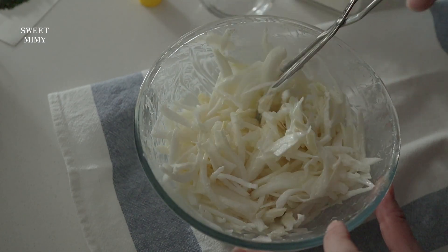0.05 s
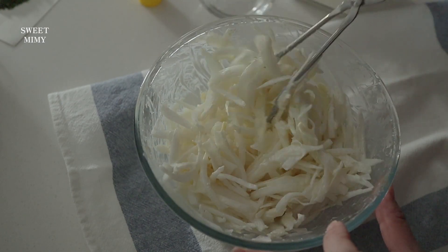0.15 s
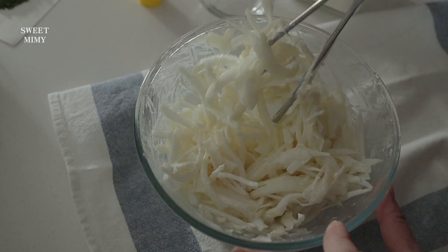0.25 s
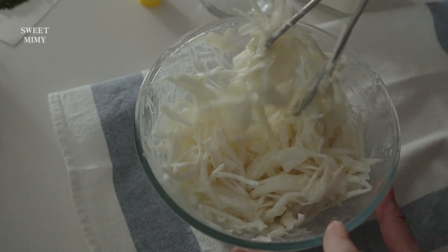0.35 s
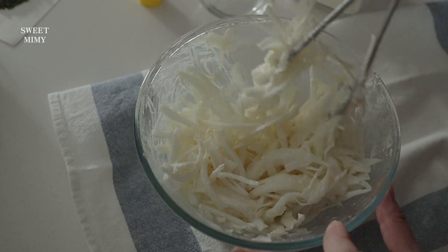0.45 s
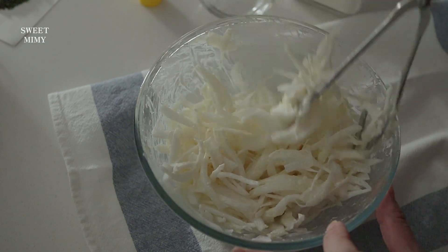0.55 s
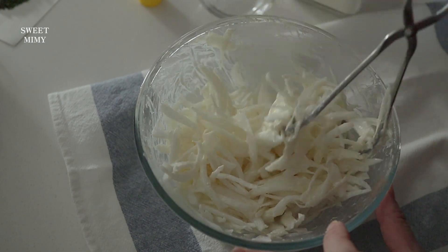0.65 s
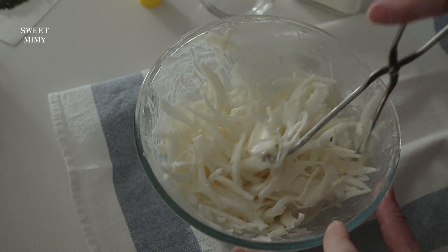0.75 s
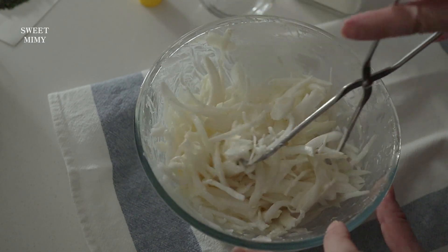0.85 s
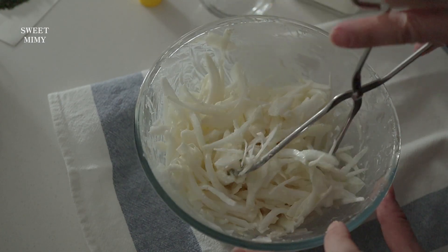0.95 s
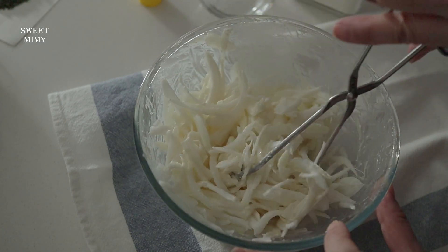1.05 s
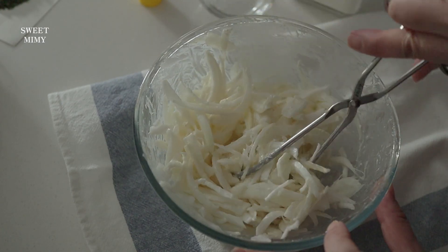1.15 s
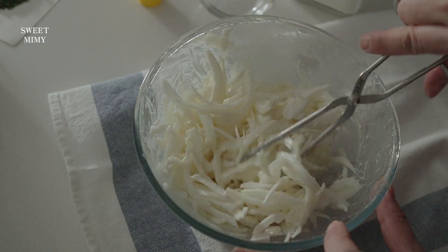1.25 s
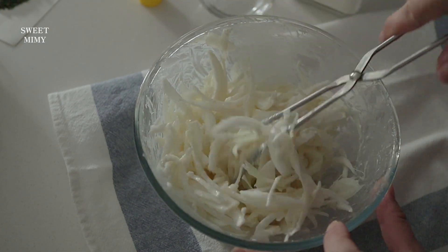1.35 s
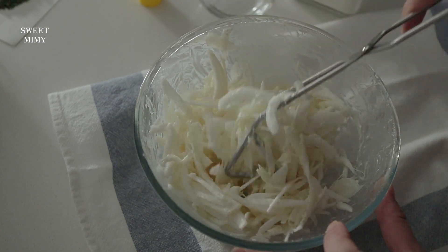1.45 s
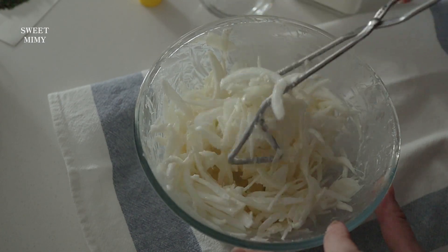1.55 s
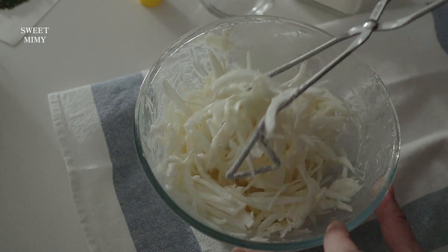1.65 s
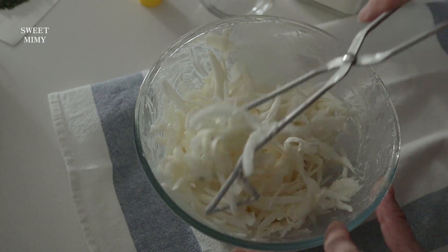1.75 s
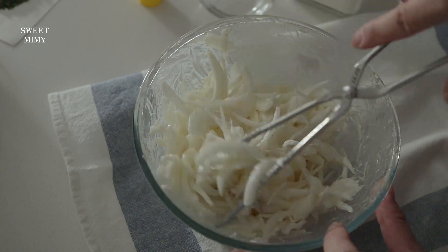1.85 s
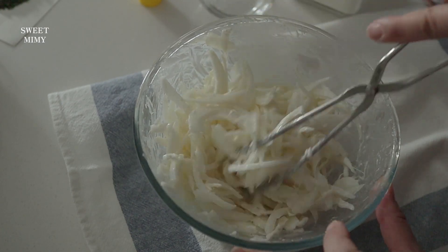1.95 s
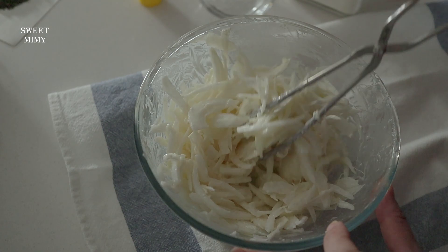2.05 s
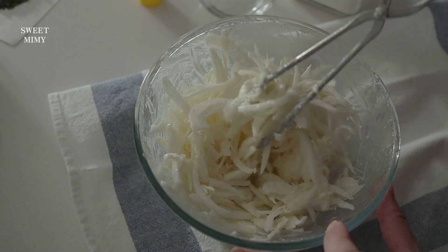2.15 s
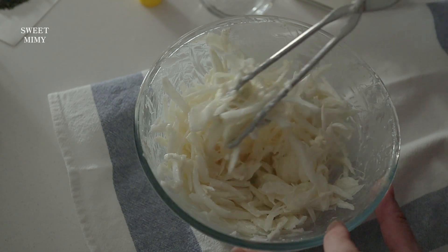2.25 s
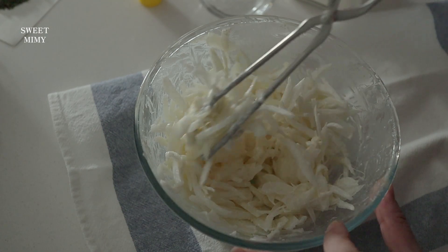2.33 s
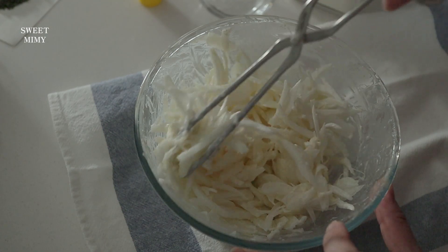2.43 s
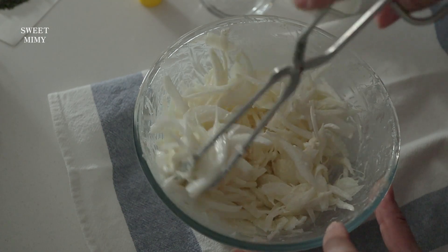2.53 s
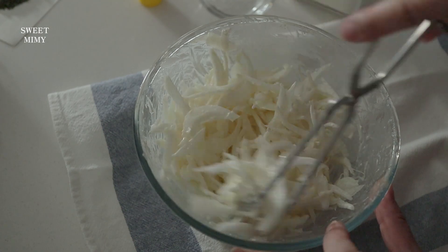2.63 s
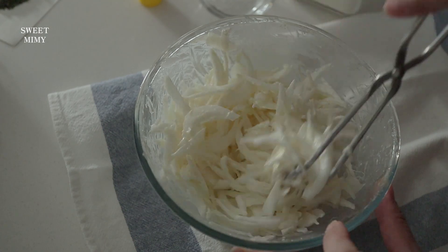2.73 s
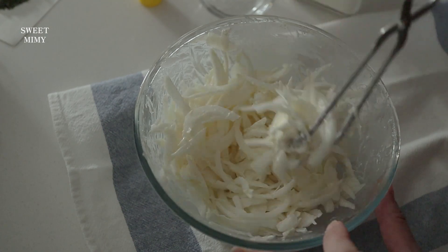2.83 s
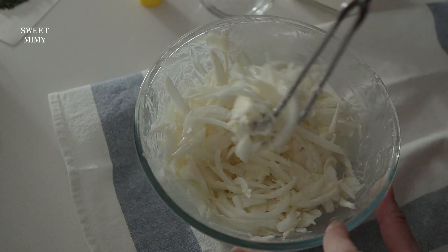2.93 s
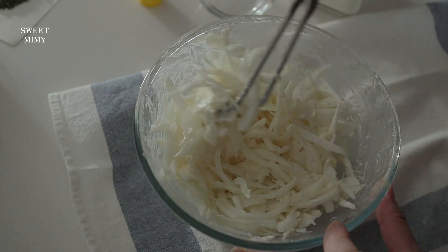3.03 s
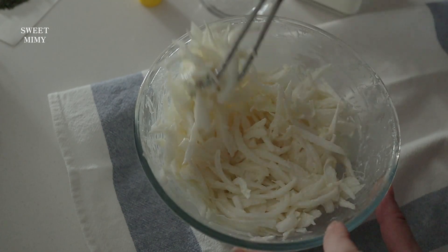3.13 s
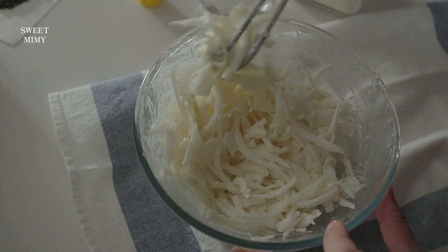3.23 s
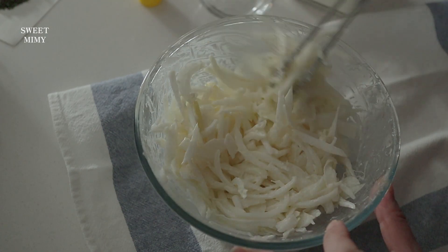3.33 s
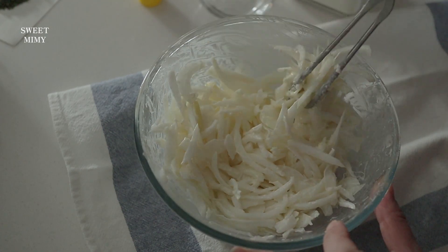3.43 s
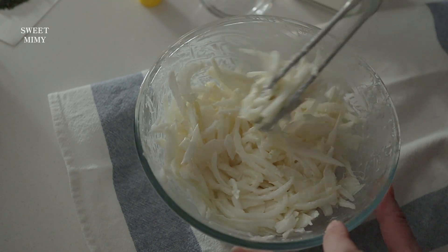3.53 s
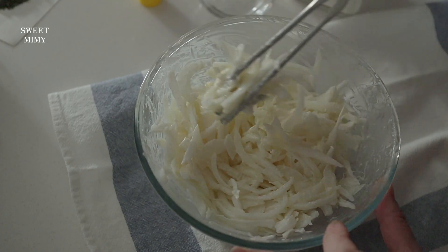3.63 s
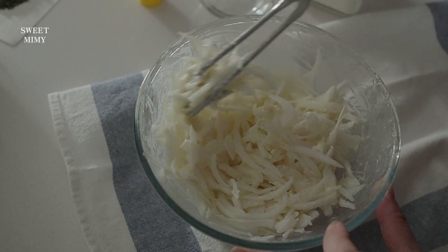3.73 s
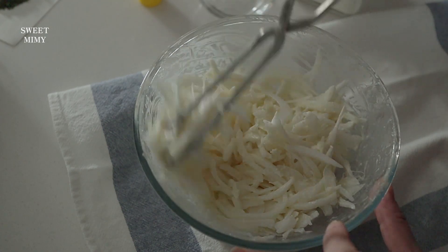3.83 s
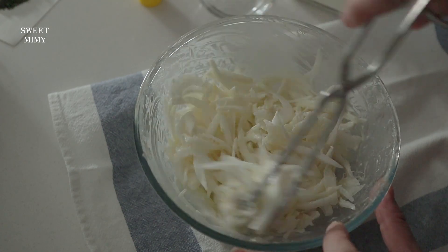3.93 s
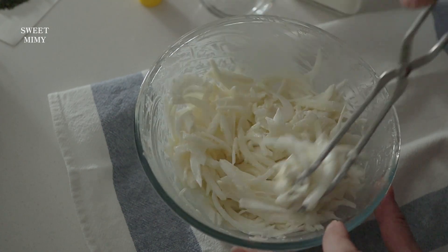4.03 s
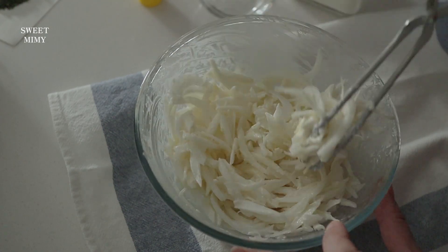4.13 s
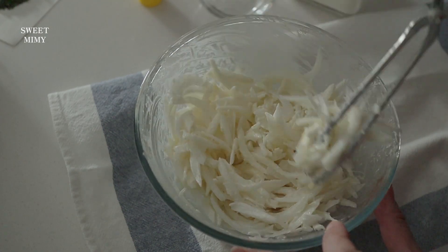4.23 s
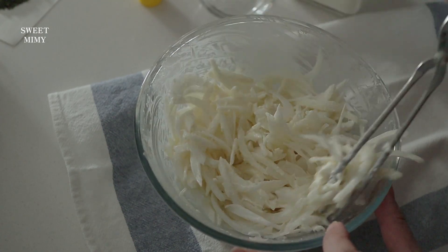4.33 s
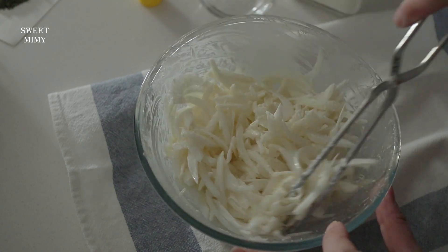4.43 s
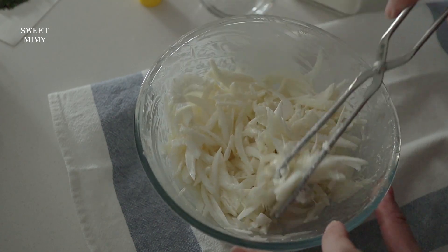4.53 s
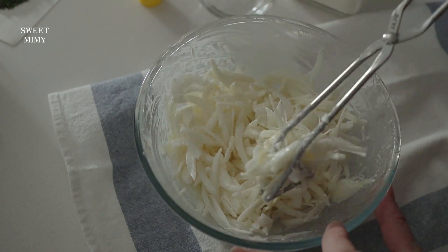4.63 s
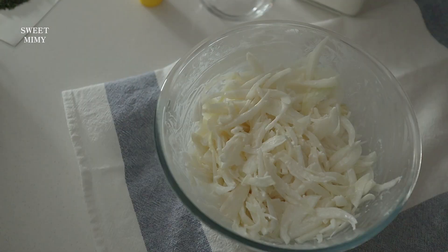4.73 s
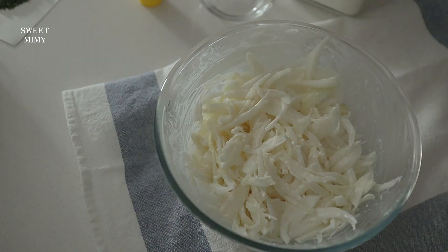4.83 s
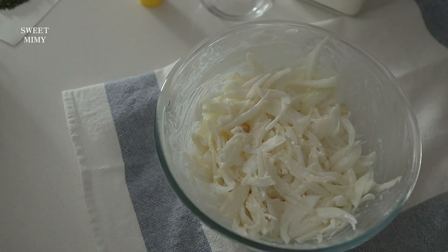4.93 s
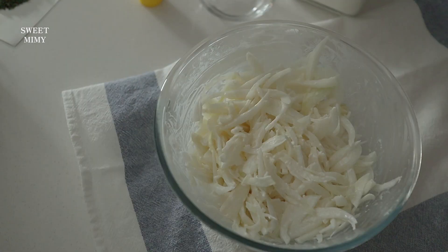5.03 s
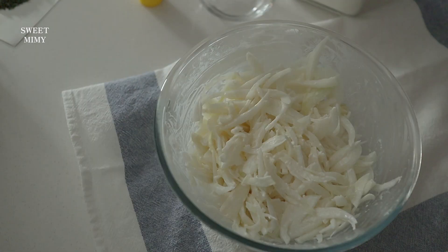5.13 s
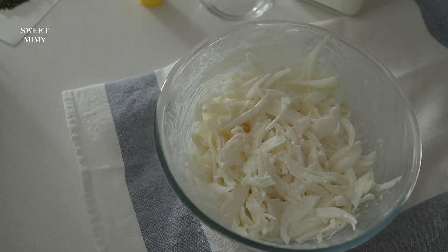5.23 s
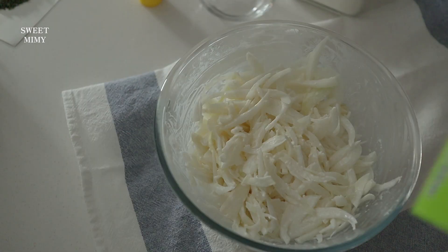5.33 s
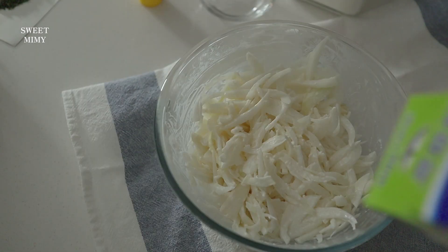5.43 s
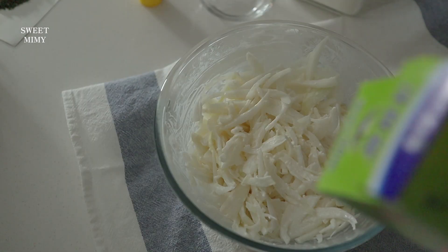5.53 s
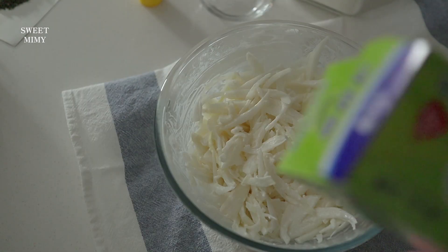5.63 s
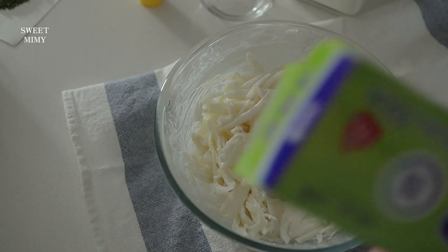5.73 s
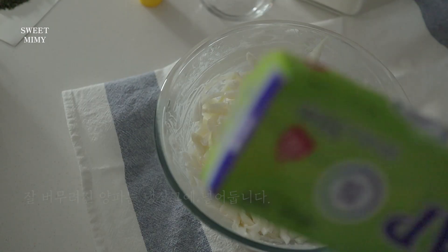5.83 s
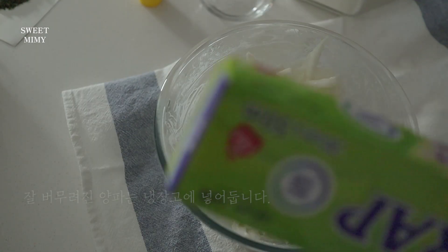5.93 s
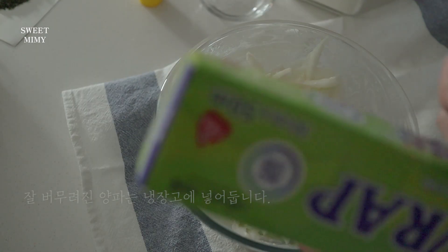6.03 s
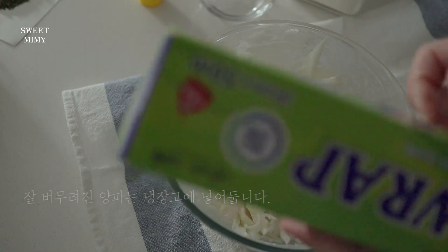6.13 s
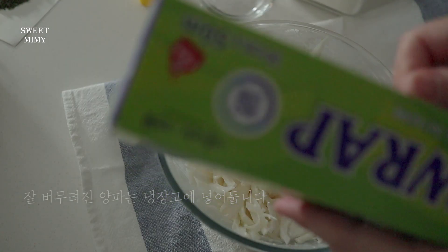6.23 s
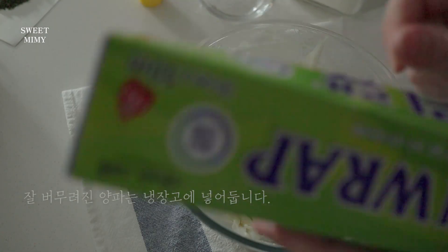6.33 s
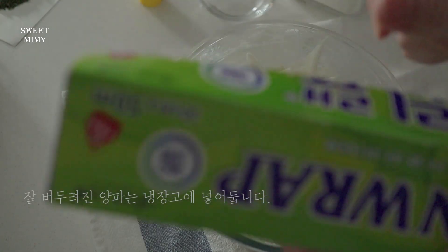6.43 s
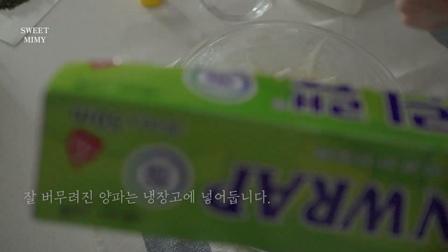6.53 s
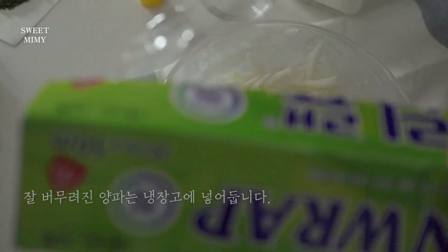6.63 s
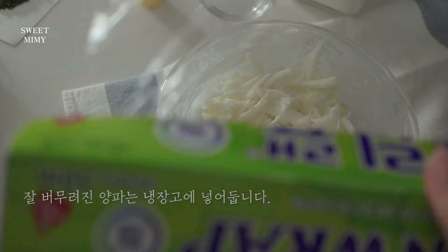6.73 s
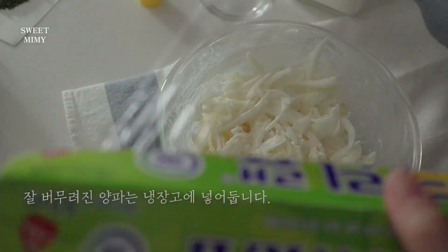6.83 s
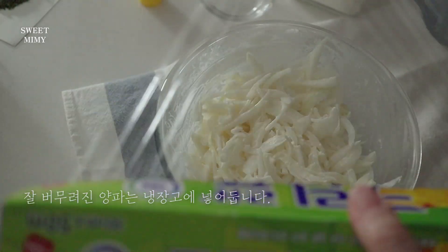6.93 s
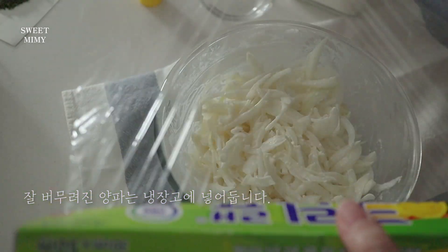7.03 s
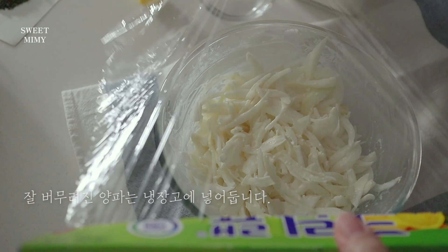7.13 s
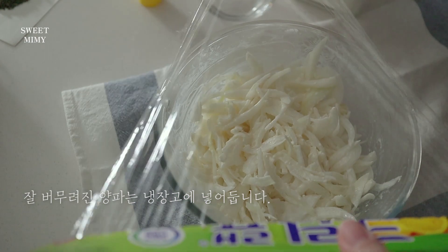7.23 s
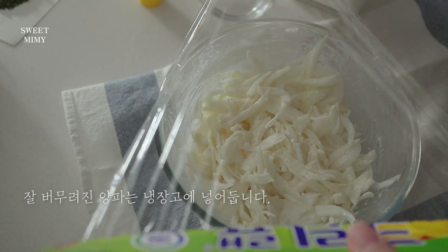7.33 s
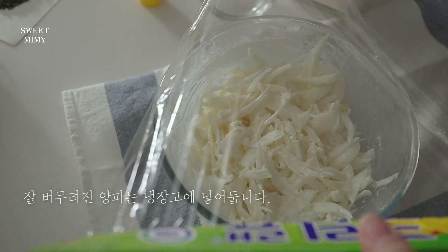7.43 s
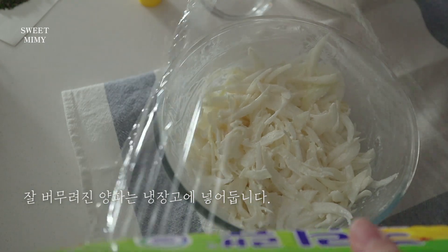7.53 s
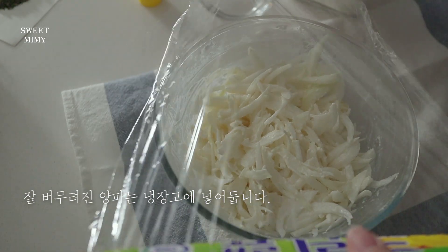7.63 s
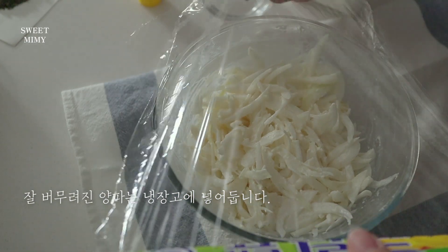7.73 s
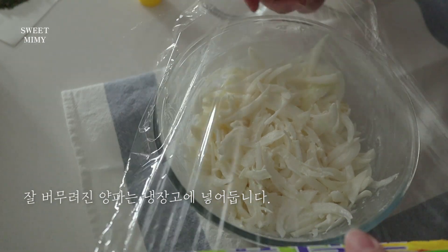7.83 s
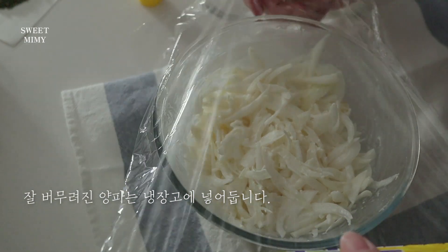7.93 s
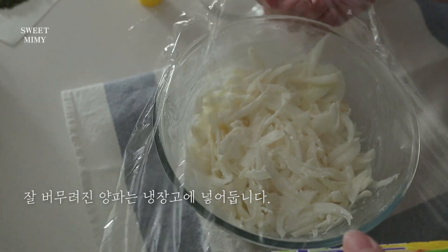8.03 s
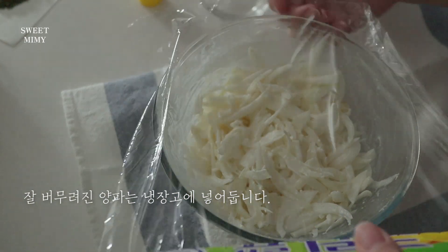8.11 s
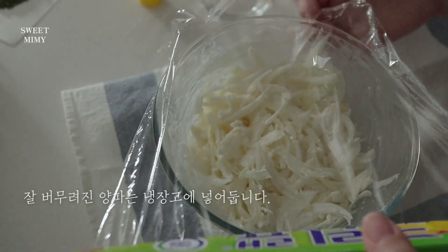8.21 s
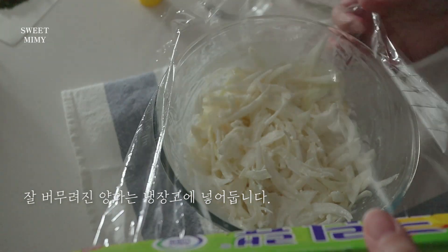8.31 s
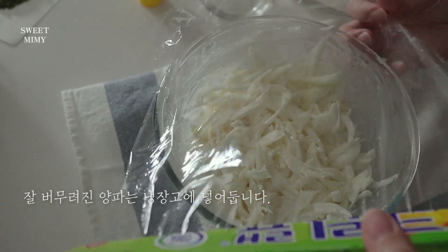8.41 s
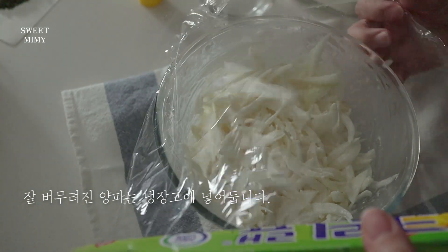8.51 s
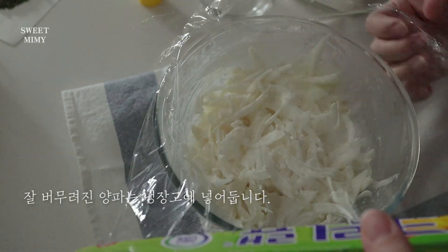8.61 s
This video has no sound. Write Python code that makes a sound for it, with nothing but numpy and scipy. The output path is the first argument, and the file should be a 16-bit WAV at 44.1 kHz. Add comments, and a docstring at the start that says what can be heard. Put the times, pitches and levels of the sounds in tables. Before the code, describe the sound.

Close kitchen sounds: sparse bright tong clinks on glass, a brief squeal, then box handling, sharp snaps and crisp plastic wrap crinkling over the bowl.

```python
"""A faint kitchen hum and a soft shuffle of a glass bowl on its towel, then metal tongs toss sliced onion in it.
Everything is close to one microphone, with a little of the room behind; the tongs clink and scrape on the glass.
Then a cardboard box of cling film is handled and film is peeled off the roll, crinkling over the bowl.
Blows and bumps set decaying sines ringing; onion, film and scraping are random clicks, filtered and swelling;
the hum is coloured noise and the room a set of feedback delays."""
import sys
import numpy as np
from scipy import signal
from scipy.fft import rfft, irfft
from scipy.io import wavfile

SR = 44100
rng = np.random.default_rng(int(sys.argv[2]) if len(sys.argv) > 2 else 0)


def to_wav(s):
    """Save 16-bit WAV."""
    ch = np.atleast_2d(s).T  # columns
    pcm = np.round(np.clip(ch, -1, 1) * 32767)  # PCM
    wavfile.write(sys.argv[1], SR, pcm.astype(np.int16))


def ratio_of_db(decibels):
    """Turn decibels (scalar or array-like) into linear amplitude factors; 0 dB maps to 1."""
    return 10 ** (np.asarray(decibels, float) / 20)


N = 382347


def rms_one(x):
    """Scaled to rms 1."""
    return x / np.sqrt(np.mean(x ** 2) + 1e-20)


def in_time(rows, outside=-120):
    """Columns as curves per sample; held at the outside value beyond the table."""
    s, *columns = np.transpose(rows)
    return [np.interp(np.arange(N) / SR, s, c, outside, outside) for c in columns]


def strokes(rows, rise_db_per_s, fall_db_per_s):
    """Each row swells to its level, holds and fades; powers add, other columns are averaged over the rows
    weighted by their power."""
    s, held, db, *columns = np.transpose(rows)[:, :, None]
    t = np.arange(0, N + 32, 32) / SR
    rise_db = rise_db_per_s * np.maximum(s - t, 0)
    fall_db = fall_db_per_s * np.maximum(t - s - held, 0)
    power = ratio_of_db(2 * np.maximum(db - rise_db - fall_db, -150))
    total = power.sum(0)
    curves = [10 * np.log10(total)] + [(c * power).sum(0) / total for c in columns]
    return [np.interp(np.arange(N) / SR, t, c) for c in curves]


def coloured(x, spectrum):
    """Minimum-phase filter of a spectrum in (Hz, dB), so clicks stay sharp and causal."""
    hz, db = np.transpose(spectrum)
    grid = np.arange(2049) * SR / 4096 + 1
    cepstrum = irfft(np.log(ratio_of_db(np.interp(np.log(grid), np.log(hz), db))))
    # folding the cepstrum makes the phase minimal
    cepstrum[1:2048] *= 2
    cepstrum[2049:] = 0
    return signal.fftconvolve(x, irfft(np.exp(rfft(cepstrum))))[:N]


def band(x, low_hz, high_hz):
    """Band-pass with gentle slopes."""
    return signal.sosfilt(signal.butter(2, [low_hz, min(high_hz, 20000)], "band", fs=SR, output="sos"), x)


def tilted(x, bright, cross_hz=5500):
    """Treble above the crossover is multiplied by the gain bright."""
    high = signal.sosfilt(signal.butter(2, cross_hz, "high", fs=SR, output="sos"), x)
    low = signal.sosfilt(signal.butter(2, cross_hz, fs=SR, output="sos"), x)
    return low - bright * high   # the minus avoids a notch at the crossover


def ring(clicks, hz, t60):
    """A damped mode: a unit click sets a sine of height 1 ringing, 60 dB down after t60 seconds."""
    r, w = ratio_of_db(-60 / (t60 * SR)), 2 * np.pi * hz / SR
    return signal.lfilter([0, np.sin(w)], [1, -2 * r * np.cos(w), r * r], clicks + 1e-18)


def hollow(x, peaks):
    """Broad resonances in parallel, with alternating signs."""
    return sum((-1) ** k * ratio_of_db(db) * np.sqrt(width) * ring(x, hz, 1.25 / width)
               for k, (hz, width, db) in enumerate(peaks))


def drift(rate):
    """Slow random curve of rms 1; rate in Hz."""
    r = np.exp(-2 * np.pi * rate / SR)
    return rms_one(signal.lfilter([1], [1, -2 * r, r * r], rng.standard_normal(N + SR))[SR:])


def grains(per_s, spread_db):
    """Random clicks of uneven size and sign; the fewer, the larger; rms 1."""
    sizes = ratio_of_db(spread_db * np.minimum(rng.exponential(1, N), 5)) * rng.choice([-1, 1], N)
    struck = rng.random(N) < per_s / SR
    return rms_one(sizes * struck / np.sqrt(np.minimum(per_s, SR)))


def burst(s, length_s):
    """Sample index and a short noise dying away exponentially."""
    t = np.arange(1024) / SR
    return round(s * SR), rng.standard_normal(1024) * np.exp(-t / length_s)


def add(out, at, piece):
    """Mixes a piece into out from sample at on."""
    out[at:at + len(piece)] += piece[:N - at]


# spectrum shape of the hum in the quiet kitchen: (frequency [Hz], level [dB])
HUM_SPECTRUM = [(15, -34.5), (25, -7), (64, 1), (92, -6.5), (180, -4), (223, -11), (277, -9.5), (427, -14),
                (641, -14.5), (695, -17.5), (818, -16.5), (1290, -23), (2050, -25.5), (16000, -33)]


def kitchen_hum():
    """The steady floor of the place: noise coloured by the hum's spectrum."""
    hum_rms_db = -48.5
    return ratio_of_db(hum_rms_db) * rms_one(coloured(rng.standard_normal(N), HUM_SPECTRUM))


def kitchen_room(x):
    """Room behind the close sound: eight feedback delays, duller on every round, stepped block by block."""
    t60_s, wall_cut_hz = 0.22, 12000
    out, dull = np.zeros(N), np.exp(-2 * np.pi * wall_cut_hz / SR)
    lags = (rng.uniform(.008, .03, 8) * SR).astype(int)
    for k, lag in enumerate(lags):
        loop, gain, state = x.copy(), ratio_of_db(-60 * lag / SR / t60_s), [0.]
        for i in range(lag, N, lag):
            back, state = signal.lfilter([gain * (1 - dull)], [1, -dull], loop[i - lag:i], zi=state)
            loop[i:i + lag] += back[:N - i]
        out += (loop - x) * (-1) ** k
    return out


# bumps of worktop and hollow box: (time [s], level [dB], pitch [Hz])
THUD_TIMES = [(.853, -26.5, 166), (3.29, -33.5, 46), (4.02, -40.5, 42.7), (4.411, -21, 110),
              (4.42, -28, 51.4), (4.849, -31.5, 374), (5.442, -11.5, 247), (5.444, -14, 87),
              (5.575, -17, 189), (5.62, -15.5, 257), (5.68, -20.5, 45.3), (6.18, -21, 102),
              (6.457, -3.5, 750), (6.67, -22.5, 145), (7.157, -16, 270), (7.158, -30.5, 49),
              (7.325, -16, 750), (7.75, -38, 83.5)]


def thuds():
    """Each bump sets one mode of worktop or hollow box ringing, softly struck."""
    ring_cycles, swell_cycles = 22, 0.47   # until 60 dB down; time constant of the onset
    out, push = np.zeros(N), np.arange(SR) == 0
    for s, db, hz in THUD_TIMES:
        swell = 1 - np.exp(-np.arange(SR) / SR * hz / swell_cycles)
        mode = band(ring(push, hz, ring_cycles / hz), hz / 3, hz * 3)
        add(out, round(s * SR), ratio_of_db(db) * swell * mode)
    return out


# bowl knocking on the towel, broad resonances: (frequency [Hz], width [Hz], level [dB])
ROCKING_PEAKS = [(194.5, 77, 4.7), (254, 65, 2.5), (590, 75.4, -3.5), (734, 120, 0)]
# bowl shuffling on the towel: (start [s], held [s], level [dB])
SHUFFLE_STROKES = [(0, .02, -48), (.853, 0.018, -36.5), (.91, 0.067, -36.5), (1.03, 0.025, -44),
                   (2.73, 0.017, -47.5)]


def bowl_on_towel():
    """The bowl rocks on the towel: clicks through broad low resonances."""
    level_db = strokes(SHUFFLE_STROKES, rise_db_per_s=800, fall_db_per_s=200)[0]
    return ratio_of_db(level_db) * rms_one(hollow(grains(600, 3.0), ROCKING_PEAKS))


# spectrum shape of the wet onion: (frequency [Hz], level [dB per Hz])
ONION_SPECTRUM = [(590, -44.5), (1000, -13), (1350, 2.5), (1850, -5.5), (2650, -1), (4470, -7.5),
                  (9170, -7), (16000, -25)]
# wet onion stirred, the first row at rest: (start [s], held [s], level [dB], brightness [dB])
STIR_STROKES = [(0, 4.7, -75.5, -27.5), (0, 0.023, -50, -2.5), (.97, .4, -52, -3.5),
                (2.08, 0.025, -65.5, 8.5), (2.72, 0.035, -57, -2.5), (3.08, .12, -70.5, 12),
                (3.9, .2, -63, 9.5)]
# short ticks of wet slices; the last is a tick as the box is picked up: (time [s], level [dB], centre [Hz])
SHORT_TICKS = [(0.863, -30, 7900), (0.8712, -22.5, 7970), (1.1967, -29, 4400), (3.8651, -41, 10300),
               (4.0544, -35, 2700), (4.146, -36, 8850), (4.6483, -31.5, 3740), (4.8322, -22.5, 3500)]


def onion():
    """Wet slices tick and hiss: unsteady clicks, and short noises in narrow bands, the last from the box."""
    wet = rms_one(coloured(grains(2700, 2.3) * ratio_of_db(1.6 * drift(28)), ONION_SPECTRUM))
    wet_db, bright_db = strokes(STIR_STROKES, rise_db_per_s=65, fall_db_per_s=73)
    out = ratio_of_db(wet_db) * tilted(wet, ratio_of_db(bright_db))
    for s, db, hz in SHORT_TICKS:
        at, tick = burst(s, 0.0021)
        add(out, at, ratio_of_db(db) * band(tick, hz / 1.3, hz * 1.14))
    return out


# spectrum shape of the film: (frequency [Hz], level [dB per Hz])
FILM_SPECTRUM = [(290, -39.5), (500, -21.5), (740, 0.5), (1080, -13.5), (1280, 1), (1460, -3), (2430, -4),
                 (3020, -9), (3700, -10), (6420, -17), (9090, -15.5), (14900, -28.5), (16000, -44.5)]
# hollow box and roll, broad resonances: (frequency [Hz], width [Hz], level [dB])
BOX_PEAKS = [(60.3, 27, -6.5), (110, 44, -4.5), (210, 64, -1.3), (375, 84, 2.5), (499, 139, 2),
             (734, 115, 0), (1001, 66, -3.5), (1545, 280, -7)]
# the open bowl under the film, broad resonances: (frequency [Hz], width [Hz], level [dB])
BOWL_PEAKS = [(750, 130, -40), (2500, 250, -55), (5900, 150, -63)]
# slow handling, rising and falling: fumbling, box lifted, film drawn off the roll, then slack:
# (time [s], film level [dB], box against film [dB])
HANDLING_CURVE = [(4.74, -75, 7), (4.77, -54.5, 3.5), (5.1, -59.5, 2.5), (5.38, -47.5, 8),
                  (5.53, -52.5, 17.5), (5.73, -36.5, 1.5), (6.06, -45.5, -1.5), (6.29, -51, 7),
                  (6.42, -34.5, -6.5), (6.56, -32.5, -7), (6.8, -22, -5.5), (7.12, -33.5, -2.5),
                  (7.5, -41, 2.5), (7.56, -47.5, 3), (8.0, -52.5, 4.5), (8.67, -50, 4)]
# separate rustles of box and film on top: (start [s], held [s], film level [dB], box against film [dB])
RUSTLE_STROKES = [(4.86, 0.051, -51, 7), (5.02, 0.036, -46.5, 1), (5.443, 0.042, -48, 19),
                  (5.545, 0.11, -28, 6.5), (6.19, 0.033, -40, -1), (6.307, 0.058, -40, 4),
                  (6.445, 0.011, -24, 2.5), (7.285, 0.038, -32.5, -1), (8.013, 0.068, -38, 5.5),
                  (8.152, 0.025, -37, 7), (8.232, .03, -50, 5), (8.342, .05, -41.5, 3),
                  (8.447, 0.069, -40.5, 5), (8.602, .02, -46, 5.5)]


def film_cracks(film_db, over_bowl):
    """Film cracks in clumps, densely when pulled hard and one by one when slack."""
    per_s = 2500 * ratio_of_db(.75 * (np.maximum(film_db, -60) + 22))
    # each pitch range cracks and drifts on its own
    edges_hz = [400, 1500, 3200, 6500, 18000]
    clumps = sum(ratio_of_db(1.3 * drift(10)) * band(grains(per_s, 0.69), low, high)
                 for low, high in zip(edges_hz, edges_hz[1:]))
    large = .6 * grains(per_s / 4, 3.5)
    hiss = (.3 - .15 * over_bowl) * rng.standard_normal(N)
    # lone small creases over the bowl, shared among seven pitch ranges
    ticks_per_s, tick_db = 120, -2
    ticks = sum(rms_one(band(grains(ticks_per_s / 7, 3.0), hz / 1.5, hz * 1.5))
                for hz in np.geomspace(2200, 15000, 7))
    return rms_one(clumps) + large + hiss + ratio_of_db(tick_db) * over_bowl * rms_one(ticks)


def wrapping():
    """Crackling film and its hollow box; stretched over the bowl the film turns brighter and resonates."""
    handling_db, handling_box_db = in_time(HANDLING_CURVE)
    rustle_db, rustle_box_db = strokes(RUSTLE_STROKES, rise_db_per_s=2500, fall_db_per_s=344)
    film_db = np.maximum(handling_db, rustle_db)
    box_db = np.where(handling_db > rustle_db, handling_box_db, rustle_box_db)
    film_over_bowl_s = 6.993
    over_bowl = np.clip(np.arange(N) / SR - film_over_bowl_s, 0, .5) * 2   # 0 to 1 in half a second

    film = rms_one(coloured(film_cracks(film_db, over_bowl), FILM_SPECTRUM))
    # treble gain, dB lost per dB of box, dB gained over the bowl
    bright_db, dulling, taut_bright_db = -1, 0.42, 7
    film = tilted(film, ratio_of_db(bright_db - dulling * np.maximum(box_db, -20) + taut_bright_db * over_bowl))
    # the stretched film also gains air at the very top
    taut_top_db, taut_top_hz = 5, 11300
    film = ratio_of_db(film_db) * tilted(film, ratio_of_db(taut_top_db * over_bowl), cross_hz=taut_top_hz)

    box = rms_one(hollow(grains(1500, 3.5) * ratio_of_db(1.1 * drift(11.6)), BOX_PEAKS))
    return film + hollow(film * over_bowl, BOWL_PEAKS) + ratio_of_db(film_db + box_db) * box


# loud snaps of film and box flap: (time [s], level [dB], brightness [dB])
LOUD_SNAPS = [(5.545, -23, 3), (6.0725, -16.5, 2), (6.2081, -17.5, 12), (6.3094, -18, -1),
              (6.4234, -9.5, 6), (6.4562, 7, 1.5), (6.5948, -9.5, 0), (6.6381, -8, 9), (6.9757, -6.5, 1),
              (7.189, -9.5, 5), (7.377, -24, 23), (7.419, -30, 15.5), (7.4495, -15.5, 10.5),
              (7.5982, -28.5, 17), (7.6741, -28, 14), (7.7728, -26, 10), (7.826, -24.5, -2),
              (7.8494, -26.5, 10), (7.963, -25, -2), (8.0128, -18, -8), (8.163, -20, 2), (8.356, -17.5, 3),
              (8.3803, -22, 8), (8.4523, -33, 5), (8.506, -16.5, 2)]


def snaps():
    """Single loud snaps: short cracks in the film's colour; the duller, the more they knock the box."""
    out, knocks = np.zeros(N), np.zeros(N)
    for s, db, bright_db in LOUD_SNAPS:
        at, crack = burst(s, 0.0028)
        add(out, at, ratio_of_db(db) * tilted(crack, ratio_of_db(bright_db)))
        knocks[at] = ratio_of_db(db - 0.35 * bright_db)
    return coloured(out, FILM_SPECTRUM) + ratio_of_db(-32.5) * hollow(knocks, BOX_PEAKS[2:])


# glass rim modes come in close pairs: (lower [Hz], upper [Hz])
RIM_PAIRS = [(549, 562), (1375, 1389), (2410, 2485), (3875, 3955), (5490, 5580), (7380, 7440), (9598, 9630),
             (11950, 12010)]
# each rim pair when struck: (level [dB], free decay t60 [s])
RIM_DECAYS = [(-14.5, 0.2), (-15.5, 0.21), (-10.5, 0.1), (-14, 0.094), (-11, 0.12), (-6, 0.075),
              (-8.5, 0.12), (-19, .05)]


def rim(drive):
    """Both modes of every rim pair ring alike."""
    return sum(ratio_of_db(d) * (ring(drive, lower, t60) + ring(drive, upper, t60))
               for (lower, upper), (d, t60) in zip(RIM_PAIRS, RIM_DECAYS))


# glass wall modes, quickly damped by the food: (frequency [Hz], level [dB], free decay t60 [s])
WALL_MODES = [(193, -3.5, 0.019), (1910, -47, 0.046), (2878, -7.5, 0.031), (3350, -18.5, 0.079),
              (3433, -21.5, 0.055), (3700, -23, 0.12), (4148, 2.5, 0.014), (4120, -31, .04),
              (5682, -7.5, 0.047), (6970, -26, 0.027), (13500, -31.5, .02)]
# tongs dragged on the glass:
# (start [s], held [s], level [dB], fade [dB per s], wall level [dB], brightness [dB])
SCRAPE_STROKES = [(1.03, .09, -56, 300, -9, -3), (1.655, .03, -57.5, 200, 2.5, 2.5),
                  (1.905, .04, -24, 220, -9, -4), (2.556, 0.013, -39.5, 400, -5.5, -1),
                  (2.61, .075, -24.5, 700, -5, -14), (2.72, 0.068, -54, 400, 1, 2),
                  (3.272, 0.058, -31, 200, -6, 10.5), (3.36, 0.061, -32, 700, 0.5, -8),
                  (3.385, 0.009, -28, 302, 1.5, 8), (4.462, 0.018, -29, 298, -7.5, -5.5)]
# a tong tip squeals up the wall: (time [s], level [dB], pitch [Hz])
SQUEAL_PATH = [(3.37, -32, 4160), (3.386, -29, 4210), (3.39, -14, 4340), (3.395, -19.5, 4360),
               (3.405, -16.5, 4066), (3.413, -16, 3850), (3.42, -35, 3740), (3.45, -40, 3750)]


def scrapes():
    """Stick and slip: dense small clicks drive the glass; the squeal is a tone of wavering pitch and level."""
    rows = np.delete(SCRAPE_STROKES, 3, axis=1)
    fade_db_per_s = np.array(SCRAPE_STROKES)[:, 3:4]
    db, wall_db, bright_db = strokes(rows, 4000, fade_db_per_s)
    slips = band(band(grains(8300, 2.9), 1200, 8300), 1118, 10500) * ratio_of_db(1.5 * drift(40))
    drag = ratio_of_db(db) * tilted(slips, ratio_of_db(bright_db), cross_hz=3300)
    on_wall = ratio_of_db(wall_db) * drag
    wall = sum(ratio_of_db(d) * ring(on_wall, hz, t60) for hz, d, t60 in WALL_MODES[1:-1])

    squeal_db, hz = in_time(SQUEAL_PATH)
    waver = 1 + .6 * drift(300)
    phase = 2 * np.pi * np.cumsum(hz + 150 * drift(192)) / SR
    squeal = ratio_of_db(squeal_db) * waver * np.sin(phase)
    return ratio_of_db(-34.5) * rim(drag) + ratio_of_db(-27.0) * wall + ratio_of_db(-6.0) * on_wall + squeal


# steel tongs ringing: (frequency [Hz], level [dB], free decay t60 [s])
TONG_MODES = [(8100, -9.5, 0.14), (7850, -11.5, 0.118), (8810, -14, 0.09), (10300, -12, 0.077),
              (10830, -17.5, 0.0683), (11900, -16.5, .04)]
# tongs on glass: (time [s], level [dB], share of the upper mode of a pair [0-1],
# best-driven frequency [Hz], fall from it [dB per octave], tongs level [dB])
CLINK_BLOWS = [(.6, -34, .6, 1300, 20, -30), (0.8157, -11, 0.8, 2580, 10, -1),
               (1.897, -1, 0.8, 2500, 4, -26), (2.5982, 5, 1, 3600, 12.5, -21),
               (3.261, -1, 0, 3300, 5.5, -4), (3.397, -11.5, 1, 7100, 36, -45),
               (3.883, -22, .6, 990, 19, -36), (3.95, -38, .5, 1200, 20, -30),
               (4.024, -16.5, 0.1, 955, 17, -24), (4.413, -21.5, 1, 1455, 11.5, -17),
               (4.455, -4, 1, 2250, 14, -14), (7.7, -25, .6, 1300, 20, -39), (8.233, -10, 1, 1680, 22, -39)]


def clinks():
    """Blows ring glass and steel; their place shares each rim pair and drives one pitch range best."""
    press_s, free_share, soft_free_share = 0.013, 0.05, .02   # softer touches let go sooner: share per dB of fall
    wall_gain_db, wall_loss = 10, 1.51   # softer blows drive the wall less: dB lost per dB of fall
    contact_hz = 11900
    out, click = np.zeros(N), np.arange(SR // 2) == 0
    fading = np.exp(-np.arange(SR // 2) / (press_s * SR))
    for s, db, upper, best_hz, fall_db, tongs_db in CLINK_BLOWS:
        upper, wall_db = np.clip(upper, 0, 1), wall_gain_db - wall_loss * fall_db
        free = np.clip(free_share + soft_free_share * fall_db, 0, 1)
        pressed = free + (1 - free) * fading   # the tong stays on the glass and damps it
        glass = [(hz, d + wall_db, 1, t60) for hz, d, t60 in WALL_MODES]
        for pair, (d, t60) in zip(RIM_PAIRS, RIM_DECAYS):
            glass += [(hz, d, share, t60) for hz, share in zip(pair, (1 - upper, upper))]
        blow = sum(ratio_of_db(d - fall_db * abs(np.log2(hz / best_hz))) * np.sqrt(share) * ring(click, hz, t60)
                   for hz, d, share, t60 in glass)
        blow += sum(ratio_of_db(d + tongs_db) * ring(click, hz, t60) for hz, d, t60 in TONG_MODES)
        at, crack = burst(s, 0.0023)
        crack_db = -2.5 + wall_db - 0.45 * fall_db
        blow[:len(crack)] += ratio_of_db(crack_db) * band(crack, best_hz / 3.5, best_hz * 5.1)
        add(out, at, ratio_of_db(db) * pressed * blow)
    return band(out, 28, contact_hz)   # the contact lasts a moment, which dulls the top


def scene():
    """Everything close to one microphone, with a little room and a steady floor."""
    room_db = -20.5
    near = thuds() + bowl_on_towel() + onion() + wrapping() + snaps() + scrapes() + clinks()
    return (near + ratio_of_db(room_db) * kitchen_room(near) + kitchen_hum())[None]


def roll_off(x):
    """The treble ends steeply here."""
    return signal.sosfilt(signal.butter(12, 16240, fs=SR, output="sos"), x)


def record(dry):
    """The loudest blows clip at full scale."""
    mix = np.clip(dry, -1, 1)
    return roll_off(mix)


dry = scene()
out = record(dry)
to_wav(out)
```